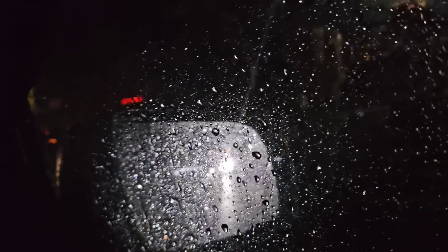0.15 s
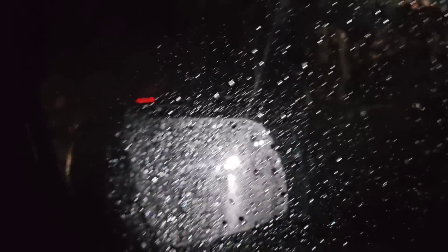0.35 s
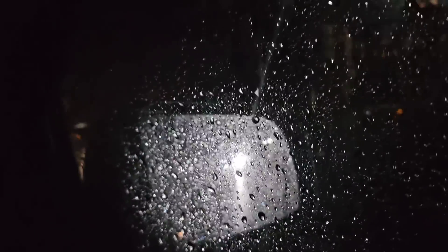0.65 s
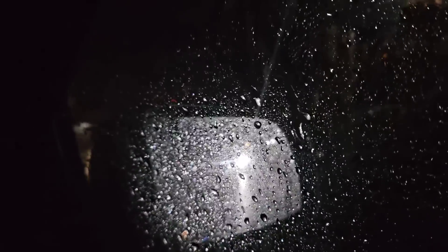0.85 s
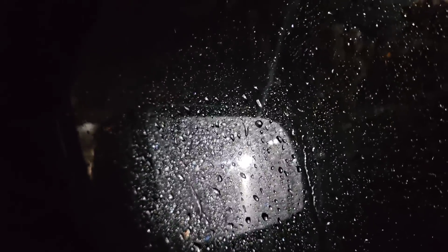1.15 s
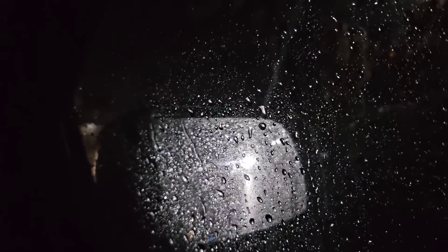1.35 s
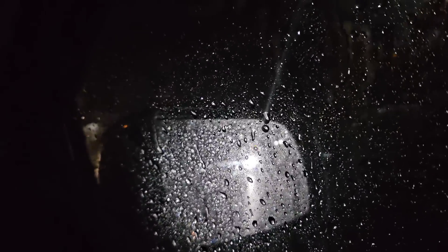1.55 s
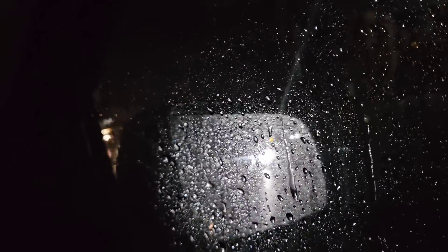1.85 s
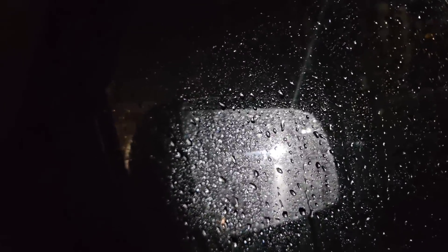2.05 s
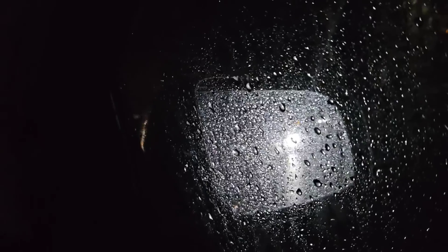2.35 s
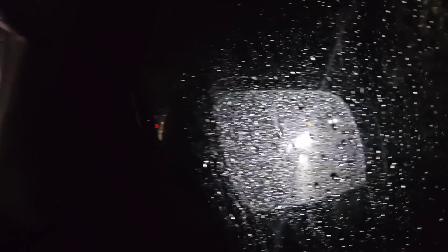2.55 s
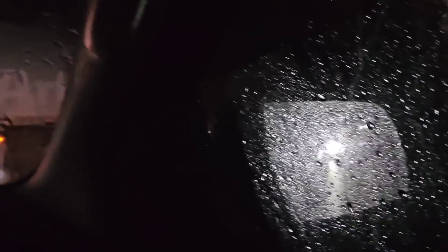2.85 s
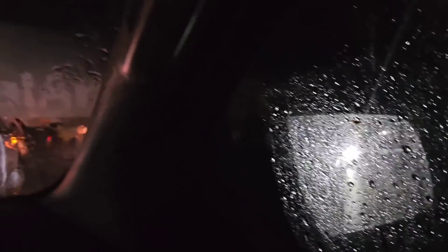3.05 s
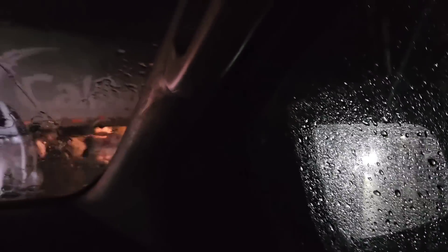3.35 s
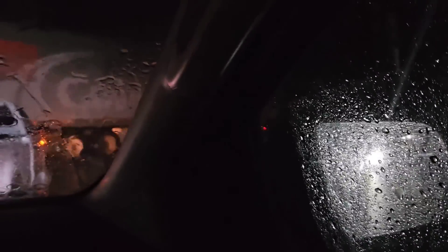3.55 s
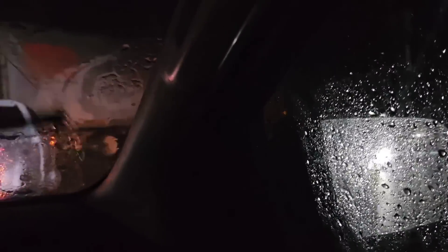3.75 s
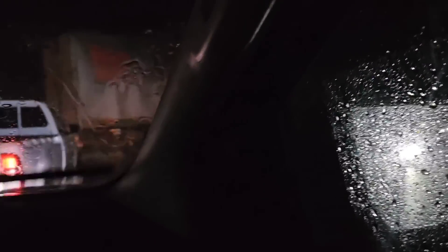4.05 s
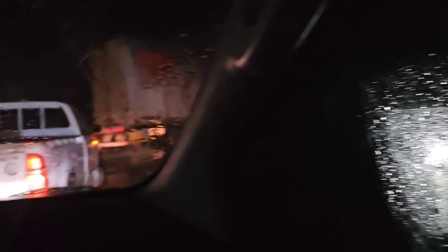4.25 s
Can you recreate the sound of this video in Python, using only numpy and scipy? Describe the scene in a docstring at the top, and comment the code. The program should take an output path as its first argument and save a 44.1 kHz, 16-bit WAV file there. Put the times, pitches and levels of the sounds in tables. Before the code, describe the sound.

Heavy rain patters and pings on car glass over deep road rumble and wet tyre hiss, with a low boom surging halfway through.

```python
"""Heavy rain on the glass and roof of a car rolling through night traffic: bursts of filtered noise and pings.
Coloured noise gives the road's rumble and the hiss of wet tyres at the right window, over a low engine hum.
Decaying tones make thuds over road seams; noise bursts make water gushes and fine spray on the panes.
Halfway through, a harmonic cabin boom surges up with a sinking pitch. Gliding tones make one thin squeak
and a few short chirps; a filtered impulse makes one dry tick.
"""
import sys
import numpy as np
from scipy import signal
from scipy.fft import rfft, irfft, next_fast_len
from scipy.io import wavfile
from scipy.ndimage import uniform_filter1d

SR = 44100
rng = np.random.default_rng(int(sys.argv[2]) if len(sys.argv) > 2 else 0)


def dump(signal):
    """Clip the signal to [-1, 1] and save it as 16-bit WAV at the path in sys.argv[1]."""
    limited = np.clip(np.atleast_2d(signal).T, -1, 1)
    pcm = np.round(limited * 32767).astype(np.int16)
    wavfile.write(sys.argv[1], SR, pcm)


N = 194098
T = np.arange(N) / SR  # time in seconds

# Engine hum: its firing rate, and its level at the start with a steady decline
ENGINE_HZ, ENGINE_START_DB, ENGINE_FADE_DB_PER_S = 30.8, -23, 4

# Harmonics of the cabin boom: multiple, relative_level_db
BOOM_HARMONICS = [(1, 4), (2, -13), (3, -21)]
# Strength of the boom, joined by straight lines: time_s, level_db
BOOM_STRENGTH = [(2.0, -36.5), (2.12, -20.5), (2.2, -15), (2.45, -18), (2.62, -21.5), (2.71, -9),
                 (2.82, -32), (2.93, -12), (3.04, -19), (3.17, -10), (3.25, -16.5), (3.34, -9.5),
                 (3.62, -17.5), (3.78, -31.5), (3.9, -16.5), (4.1, -30.5), (4.4, -40)]
# The boom's pitch sinks steadily, then settles
BOOM_FROM_S, BOOM_START_HZ, BOOM_SAG_HZ_PER_S, BOOM_END_HZ = 2.1, 51.64, 7.8, 43.66

# Spectrum of the body's sway: frequency_hz, level_db
SWAY_SPECTRUM = [(16, -11.5), (23, -11), (33, -14), (43, 9), (57, 2), (70, 5), (85, -9)]
# Spectrum of the body's shaking: frequency_hz, level_db
BODY_SPECTRUM = [(60, -11.5), (76, -5), (93, 1), (113, 3), (129, 3), (146, 2), (170, 2), (192, -0.5),
                 (215, -9.5), (240, -12.5)]
# Spectrum of the roar through the floor: frequency_hz, level_db
ROAR_SPECTRUM = [(170, -6.5), (222, 2), (300, -3), (365, -1.5), (450, -6.5)]
# Spectrum of water washing round the wheel arches: frequency_hz, level_db
WASH_SPECTRUM = [(380, -8.5), (480, -6.5), (600, -4), (760, -7), (1000, -8.5), (1400, -16)]
# Spectrum of tyre spray: frequency_hz, level_db
SPRAY_SPECTRUM = [(520, -15), (800, -14), (980, 0.5), (1130, 0.5), (1205, 0.5), (1255, 5), (1305, -1),
                  (1430, -2.5), (1560, -11.5), (1900, -17), (2500, -28), (3500, -46.5)]
# Base levels, before the swells and the wetter stretch
SWAY_DB, BODY_DB, ROAR_DB, WASH_DB, SPRAY_DB = -27.5, -25.5, -30, -32.5, -23.5
# Rough patches that shake the body more, or less where negative: centre_s, length_s, rise_db
ROUGH_PATCHES = [(.08, 0.36, -0.5), (.47, 0.47, 3), (1.19, 0.54, 2.5), (2.2, 0.63, 2), (2.7, 0.46, 2.5),
                 (3.31, 0.48, 3), (3.64, 0.14, -2), (4.22, 1, 2.5)]
# Asphalt that sets the body or the air in the tyres droning: start_s, length_s, pitch_hz, level_db
ASPHALT_DRONES = [(1.627, 0.33, 128.6, -27.5), (2.066, 0.51, 198.6, -29), (2.517, 0.68, 196.6, -27.5),
                  (3.175, 0.6, 127.3, -26.5), (3.592, 0.34, 198.2, -31)]
DRONE_FADE_S, DRONE_WANDER_HZ = 0.069, 6.82
# A wetter stretch of road: more spray, wash and sway, less roar
WET_FROM_S, WET_OVER_S = 2.53, 0.47
WET_SPRAY_DB, WET_WASH_DB, WET_ROAR_DB, WET_SWAY_DB = 2, 2.5, -1.5, 1
# Puddles under the tyres: centre_s, length_s, rise_db
PUDDLE_SWELLS = [(.74, 0.12, 3), (1.68, 0.51, 1.5), (2.28, 0.065, 3), (2.68, 0.22, 2.5), (3.25, 0.34, 1.4),
                 (4.25, 0.39, 0.7)]
# Smooth patches on which the treads sing out: centre_s, length_s, rise_db
TREAD_SWELLS = [(1.69, 0.16, 9), (3.21, 0.12, 2), (3.55, 0.16, 5), (4.11, .16, 9), (4.32, 0.19, 10.5)]
TREAD_HZ, TREAD_WANDER_HZ, TREAD_BELOW_MIST_DB = 1275, 25, -15

# Spectrum of struck glass: frequency_hz, level_db
GLASS_SPECTRUM = [(300, -0.5), (600, 8.5), (1000, 9), (1700, 9.5), (2300, 3.5), (2700, 2.5), (3400, 3),
                  (4200, -2), (4700, -5.5), (5300, -16), (6200, -25), (7400, -37.5), (9000, -55.5)]
# Duller rain on the right side: frequency_hz, gain_db
RIGHT_RAIN_SHADE = [(500, -9), (1700, 2.5), (2500, -10.5), (3300, -10), (4500, -17), (7000, -14.5)]
# Heavy drops on the glass, as struck: start_s, splash_impulse_db, ping_pitch_hz, ping_level_db
HEAVY_DROPS = [(0.254, -32, 2420, -35), (.305, -25, 3300, -37), (.337, -26.5, 2440, -26),
               (0.4307, -32.5, 3330, -40), (.498, -40.5, 3400, -43), (.5398, -36, 3500, -26),
               (0.901, -25.5, 3300, -41), (1.0716, -42.5, 3200, -39), (1.385, -33, 3400, -34),
               (1.489, -25, 3400, -40), (1.646, -27.5, 3230, -38), (1.68, -22.5, 3300, -41),
               (1.7336, -33, 2570, -38.5), (1.939, -24, 3270, -40), (2.017, -29.5, 3230, -38),
               (2.0745, -27, 3760, -40), (2.272, -25.5, 3200, -31), (2.467, -25.5, 2460, -38),
               (3.094, -31, 3050, -40), (3.1585, -24, 3180, -32), (3.2162, -27.5, 3150, -29.5),
               (3.291, -31, 3090, -31), (4.001, -33.5, 2810, -40), (4.2244, -29, 2650, -43),
               (4.2868, -31, 2780, -40)]
# Flurries of rain: centre_s, length_s, rise_db
RAIN_FLURRIES = [(1.9, 1.0, 1), (3.2, 0.68, 0.5)]
PATTER_DB, PING_T60_S, PING_ATTACK_S = -32.5, .025, .002

# Sheets of fine spray brushing the panes, before panning: centre_s, length_s, level_db
FINE_SHEETS = [(0.005, .1, -47.5), (0.304, .07, -50), (0.428, .06, -55), (0.74, 0.08, -55.5),
               (2.082, .08, -49), (2.48, 0.066, -47), (3.227, 0.61, -50.5), (3.866, 0.67, -52.5),
               (4.23, 0.21, -51.5)]
# Spectrum of fine spray: frequency_hz, level_db
SHEET_SPECTRUM = [(1700, 0), (3200, 4.5), (4600, -2.5), (5400, -10), (6400, -14), (7400, -25), (8500, -47)]

# Wheels thudding over road seams: start_s, pitch_hz, envelope_peak_db
SEAM_THUDS = [(.01, 126.4, -19.5), (0.123, 122.4, -19), (0.24, 121, -20.5), (1.186, 104, -21),
              (1.876, 129.4, -20.5), (2.682, 108.6, -20), (2.948, 95.3, -18), (3.247, 116, -14.5),
              (3.324, 100.4, -12), (4.021, 117, -17.5), (4.179, 105, -17.5)]
THUD_RISE_S = 0.014

# Water slapping the wheel arch, as struck: start_s, impulse_db
ARCH_GUSHES = [(.02, -13), (.69, -15), (1.165, -13), (1.59, -10), (1.67, -10.5), (2.25, -15), (2.64, -11.5),
               (2.81, -7), (3.2475, -8.5), (3.295, -11), (3.915, -8.5), (4.06, -15)]
# Spectrum of a gush: frequency_hz, level_db
GUSH_SPECTRUM = [(450, -4), (750, -0.5), (1000, 5), (1300, 6.5), (1600, -3.5), (2400, -23.5)]
GUSH_T60_S = .16

# Partials of the squeak, before gating and panning: start_pitch_hz, level_db
SQUEAK_PARTIALS = [(2090, -47), (2330, -44.5)]
SQUEAK_AT_S, SQUEAK_S, SQUEAK_RISE_HZ_PER_S = .172, .125, 1200

TICK_S, TICK_IMPULSE_DB = 2.1099, -13.5

# Rising chirps at their source: start_s, length_s, start_pitch_hz, end_pitch_hz, level_db
RISING_CHIRPS = [(2.114, .03, 1600, 2200, -26), (2.413, .034, 1600, 2150, -26.5),
                 (2.717, .026, 1400, 1950, -19), (3.783, .028, 1450, 2200, -23),
                 (4.151, .025, 1500, 2200, -22)]
# Dulling of the chirps through the door: frequency_hz, gain_db
DOOR_SHADE = [(1100, 4.5), (1700, -3), (2150, -9), (2400, -14)]
CHIRP_ROUGH_HZ, CHIRP_FIZZ_DB = 170, -3

HISS_DB, TOP_HZ = -79.5, 15700


def undb(db):
    """Amplitude ratio: twenty decibels are a factor of ten in gain."""
    return 10 ** (np.asarray(db) / 20)


def unit(x):
    """Normalisation: scale to a root-mean-square of 1."""
    return x / np.sqrt(np.mean(x ** 2))


def colour(x, points, skirt_db=30):
    """Minimum-phase filtering by (Hz, dB) points, falling by skirt_db an octave beyond both ends."""
    size = 2 ** 15
    hz, db = np.transpose(points)
    octave = np.log2(np.arange(size // 2 + 1) * SR / size + 1)
    knots = np.log2(hz)
    outside = np.abs(octave - np.clip(octave, knots[0], knots[-1]))
    gain = undb(np.interp(octave, knots, db) - skirt_db * outside)
    # folding the cepstrum onto positive time makes the filter causal
    cepstrum = irfft(np.log(gain))
    cepstrum[1:size // 2] *= 2
    cepstrum[size // 2 + 1:] = 0
    response = irfft(np.exp(rfft(cepstrum)))
    padded = next_fast_len(N + size, True)
    return irfft(rfft(x, padded) * rfft(response, padded), padded)[..., :N]


def noise(points, channels=1):
    """Filtered white noise: independent channels share a spectrum but not a waveform."""
    return unit(colour(rng.standard_normal((channels, N)), points))


def all_round(points, diffuse):
    """Partial coherence: noise common to both sides plus a diffuse share unrelated between them."""
    return unit(noise(points) + diffuse * noise(points, channels=2))


def walk(rate):
    """Slow random modulation: stepped noise, smoothed twice, with a spread near 1."""
    step = int(SR / rate)
    stepped = rng.standard_normal(N)[np.arange(N) // step]
    return 1.1 * uniform_filter1d(uniform_filter1d(stepped, step), step)


def turn(hz):
    """Phase as the time integral of frequency, in radians."""
    return 2 * np.pi * np.cumsum(hz) / SR


def pan(db):
    """Interaural level difference: left and right gains for a left-minus-right level."""
    return undb(np.array([[db], [-db]]) / 2)


def cabin(x, t60, wet_db):
    """Reverberation: direct sound plus dense, quickly dying reflections, different on each side."""
    t = T[:SR // 8]
    late = t > .001  # seconds before the first reflection
    tail = rng.standard_normal((2, len(t))) * undb(-60 * t / t60) * late
    response = undb(wet_db) * tail / np.sqrt(np.sum(tail ** 2, axis=1, keepdims=True))
    response[:, 0] += 1
    both = signal.fftconvolve(x * np.ones((2, 1)), response, axes=1)[:, :N]
    return both / np.sqrt(1 + undb(2 * wet_db))


def held(start, length, fade):
    """Trapezoidal envelope: fades in, holds at 1 and fades out."""
    return np.clip(np.minimum(T - start, start + length - T) / fade, 0, 1)


def surge(start, length, attack):
    """Attack and decay: rises linearly to 1, then ebbs for the rest of its length."""
    age = T - start
    ebb = (length - age) / max(length - attack, .01)
    return np.clip(np.minimum(age / attack, ebb), 0, 1)


def swells(table):
    """Level modulation in dB: a sum of smooth cosine-squared humps (centre, length, rise)."""
    return sum(rise_db * np.cos(np.pi * np.clip((T - centre) / length, -.5, .5)) ** 2
               for centre, length, rise_db in table)


def wetness():
    """Gradual surface change: 0 on the first stretch of road, 1 on the wetter one."""
    return np.clip((T - WET_FROM_S) / WET_OVER_S, 0, 1)


def impacts(rows):
    """Impulsive excitation: one single-sample blow for each (s, dB) row."""
    out = np.zeros(N)
    for start, db in rows:
        out[int(start * SR)] = undb(db)
    return out


def shower(per_s, spread_db, largest_db, channels):
    """Random arrivals: impulses of drops landing by chance, many small, a few large."""
    lands = rng.random((channels, N)) < per_s / SR
    size_db = spread_db * rng.exponential(size=(channels, N))
    return lands * undb(np.minimum(size_db, largest_db))


def splash(sizes, t60):
    """Incoherent addition: the energies of exponentially decaying noise bursts sum, not their amplitudes."""
    energy_kept = undb(-120 / (t60 * SR))  # per sample
    energy = signal.lfilter([1], [1, -energy_kept], sizes ** 2)
    return np.sqrt(energy) * rng.standard_normal(sizes.shape)


def ring(start, hz, t60):
    """Damped resonance: a softly struck mode dies away exponentially."""
    age = T[:SR // 10]
    onset = 1 - np.exp(-(age / PING_ATTACK_S) ** 2)
    mode = onset * np.sin(2 * np.pi * hz * age) * undb(-60 * age / t60)
    return np.pad(mode, (int(start * SR), N))[:N]


def engine_hum():
    """Periodic firing: a low sine of slightly unsteady rate and level grows fainter."""
    hum = unit(np.sin(turn(ENGINE_HZ * (1 + 0.013 * walk(6.0)))))
    return hum * undb(ENGINE_START_DB - ENGINE_FADE_DB_PER_S * T + 1.1 * walk(7.9))


def cabin_boom():
    """Harmonic series: a deep fundamental and its overtones sink together and come in surges."""
    sinking = BOOM_START_HZ - BOOM_SAG_HZ_PER_S * (T - BOOM_FROM_S)
    phase = turn(np.clip(sinking, BOOM_END_HZ, BOOM_START_HZ))
    boom = unit(sum(undb(db) * np.sin(k * phase + 0.12 * (k - 1) * walk(13))
                    for k, db in BOOM_HARMONICS))
    return boom * undb(np.interp(T, *np.transpose(BOOM_STRENGTH)) + 0.8 * walk(18))


def asphalt_drones():
    """Narrow-band resonance: sines of wandering pitch and level fade in and out over patches of asphalt."""
    out = np.zeros(N)
    for start, length, hz, db in ASPHALT_DRONES:
        tone = unit(np.sin(turn(hz + DRONE_WANDER_HZ * walk(25.11))))
        out += tone * undb(db + 1.7 * walk(22.3)) * held(start, length, DRONE_FADE_S)
    return out


def road():
    """Broadband excitation: asphalt sways and shakes the body and roars through the floor; water washes."""
    sway = all_round(SWAY_SPECTRUM, diffuse=0.25) * undb(SWAY_DB + WET_SWAY_DB * wetness())
    body = all_round(BODY_SPECTRUM, diffuse=0.065) * undb(BODY_DB + swells(ROUGH_PATCHES))
    roar_db = ROAR_DB + WET_ROAR_DB * wetness() + 1.8 * walk(12)
    roar = all_round(ROAR_SPECTRUM, diffuse=0.62) * undb(roar_db)
    wash_db = WASH_DB + WET_WASH_DB * wetness() + swells(PUDDLE_SWELLS) + 1.8 * walk(14)
    wash = all_round(WASH_SPECTRUM, diffuse=0.94) * undb(wash_db)
    return (sway + body + asphalt_drones()) * pan(.6) + roar * pan(-2.8) + wash * pan(-0.63)


def spray(lag_s=0.00063, across_db=-20, scattered_db=-21, spatter_db=-1):
    """Interaural delay: singing treads and flung drops at the right reach the left later and weaker."""
    mist, scattered = noise(SPRAY_SPECTRUM, channels=2)
    drops = shower(per_s=350, spread_db=2.0, largest_db=7, channels=1)[0]
    spatter = unit(colour(drops, SPRAY_SPECTRUM))
    singing = np.sin(turn(TREAD_HZ + TREAD_WANDER_HZ * walk(80))) * undb(7.3 * walk(25))
    tread = undb(TREAD_BELOW_MIST_DB + swells(TREAD_SWELLS)) * unit(singing)
    right = unit(mist + undb(spatter_db) * spatter + tread)
    left = undb(across_db) * np.interp(T - lag_s, T, right) + undb(scattered_db) * scattered
    level_db = SPRAY_DB + WET_SPRAY_DB * wetness() + swells(PUDDLE_SWELLS) + 0.37 * walk(20)
    return np.array([left, right]) * undb(level_db)


def rain(ticks_db=-9):
    """Superposed impacts: countless small drops patter in flurries; heavy ones splash and ping the glass."""
    fine_drops = shower(per_s=1800, spread_db=1.8, largest_db=13, channels=2)
    fine = unit(colour(splash(fine_drops, t60=0.04), GLASS_SPECTRUM))
    tick_drops = shower(per_s=120, spread_db=1.5, largest_db=5, channels=2)
    ticks = unit(colour(splash(tick_drops, t60=0.015), GLASS_SPECTRUM))
    patter_db = PATTER_DB + swells(RAIN_FLURRIES) + 1.0 * walk(26.63)
    patter = unit(fine + undb(ticks_db) * ticks) * undb(patter_db)
    blows = impacts([(start, db) for start, db, _, _ in HEAVY_DROPS])
    heavy = colour(splash(blows, t60=0.084), GLASS_SPECTRUM)
    pings = sum(undb(db) * ring(start, hz, PING_T60_S) for start, _, hz, db in HEAVY_DROPS)
    left, right = patter + cabin(heavy + pings, t60=0.01, wet_db=-6.5)
    return np.array([left, colour(right, RIGHT_RAIN_SHADE)])


def sheets():
    """Dense random impacts: clouds of tiny droplets brighten the patter, mostly on the left."""
    droplets = shower(per_s=3800, spread_db=4.0, largest_db=7.5, channels=2)
    grains = unit(colour(splash(droplets, t60=0.011), SHEET_SPECTRUM))
    size = sum(undb(db) * swells([(centre, length, 1)]) for centre, length, db in FINE_SHEETS)
    return grains * size * pan(16)


def thuds():
    """Damped vibration: road seams knock the body; each knock swells and dies within a few cycles."""
    out = np.zeros(N)
    for start, hz, db in SEAM_THUDS:
        age = np.maximum(T - start, 0)
        envelope = age / THUD_RISE_S * np.exp(1 - age / THUD_RISE_S)
        out += undb(db) * envelope * np.sin(2 * np.pi * hz * age)
    return out


def gushes(across_db=-9):
    """Decaying turbulence: water slaps the right wheel arch as noise bursts, weaker on the left."""
    right = colour(splash(impacts(ARCH_GUSHES), t60=GUSH_T60_S), GUSH_SPECTRUM)
    return np.array([undb(across_db) * right, right])


def squeak():
    """Inharmonic partials: two close, broken tones creep upward faintly on the left."""
    rise = SQUEAK_RISE_HZ_PER_S * np.clip(T - SQUEAK_AT_S, 0, SQUEAK_S)
    tone = np.zeros(N)
    for hz, db in SQUEAK_PARTIALS:
        partial = np.sin(turn(hz + rise + 100 * walk(400))) * undb(5 * walk(90))
        tone += unit(partial) * undb(db)
    return cabin(tone * held(SQUEAK_AT_S, SQUEAK_S, fade=.02), t60=.05, wet_db=-8) * pan(6)


def tick():
    """Impulse response: one filtered impulse gives a tiny, thin, dry tick in the centre."""
    return colour(impacts([(TICK_S, TICK_IMPULSE_DB)]), [(4000, 2.5), (16000, -3.5)], skirt_db=6)


def chirps():
    """Frequency modulation: quick tones glide upward on the right, roughened and wrapped in fizz."""
    hz, size = np.zeros(N), np.zeros(N)
    for start, length, start_hz, end_hz, db in RISING_CHIRPS:
        progress = (T - start) / length
        sounding = (progress > 0) & (progress < 1)
        hz += sounding * (start_hz + (end_hz - start_hz) * progress)
        size += undb(db) * surge(start, length, attack=length / 3)
    # complex noise varies both the amplitude and the phase of the tone
    fizz = undb(CHIRP_FIZZ_DB) * (walk(900) + 1j * walk(900))
    carrier = np.exp(1j * turn(hz + CHIRP_ROUGH_HZ * walk(900)))
    glide = size * np.imag((1 + fizz) * carrier)
    return cabin(colour(glide, DOOR_SHADE), t60=.04, wet_db=-9) * pan(-8)


def scene():
    """Linear superposition: the sounds of all sources add at the two ears."""
    steady = engine_hum() + cabin_boom() + road() + spray() + rain()
    return steady + sheets() + thuds() + gushes() + squeak() + tick() + chirps()


def record(dry):
    """Band limitation: a very faint hiss joins and a steep low-pass removes the top."""
    hiss_spectrum = [(7000, -9.0), (9000, -22.0), (12000, 8.5), (16000, 5)]
    hiss = all_round(hiss_spectrum, diffuse=1.0) * undb(HISS_DB)
    low_pass = signal.ellip(8, .2, 70, TOP_HZ, fs=SR, output="sos")
    return signal.sosfilt(low_pass, dry + hiss)


dry = scene()
out = record(dry)
dump(out)
```